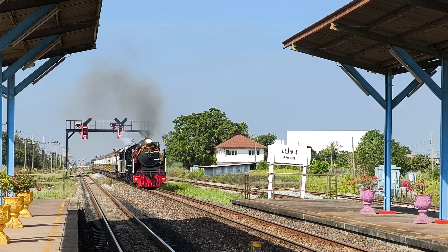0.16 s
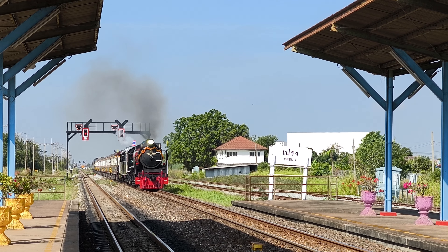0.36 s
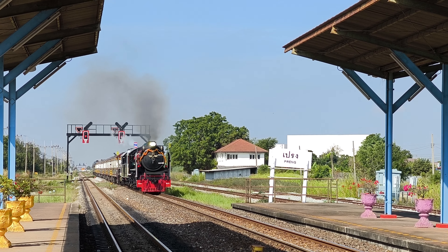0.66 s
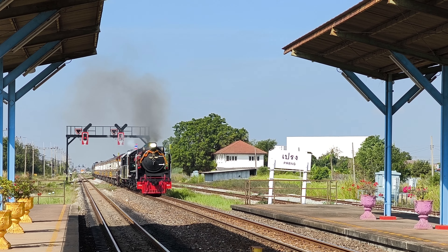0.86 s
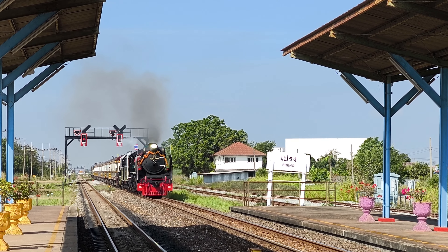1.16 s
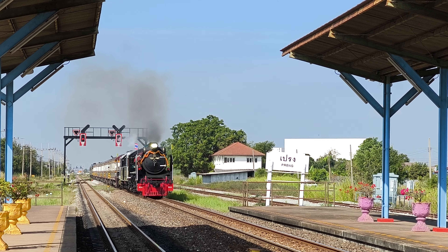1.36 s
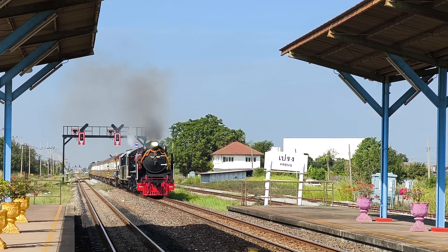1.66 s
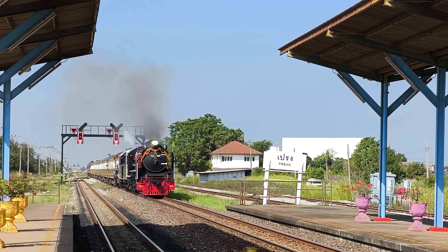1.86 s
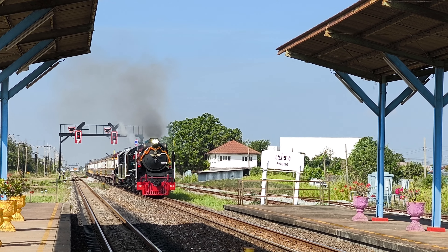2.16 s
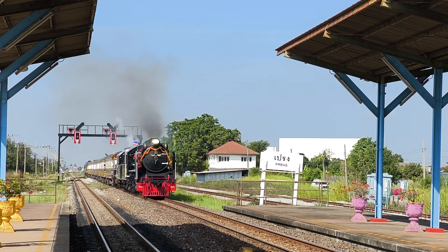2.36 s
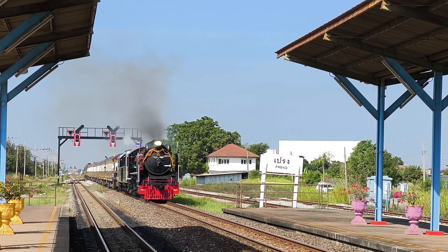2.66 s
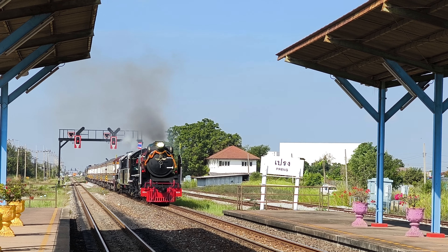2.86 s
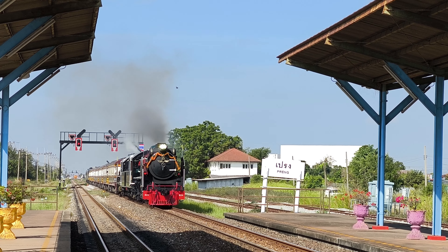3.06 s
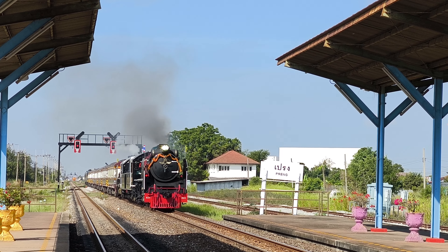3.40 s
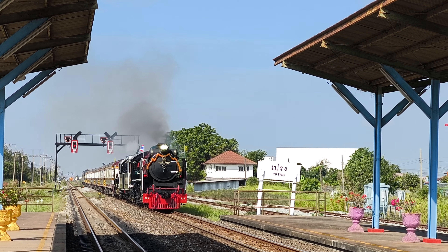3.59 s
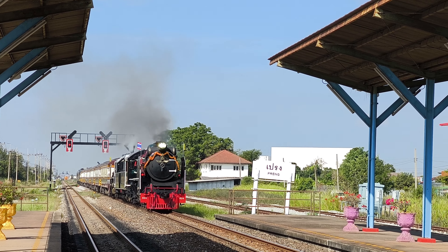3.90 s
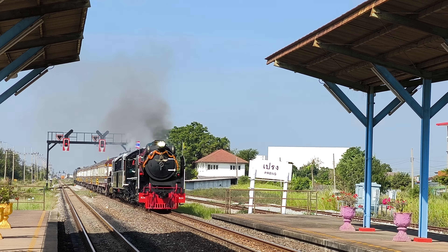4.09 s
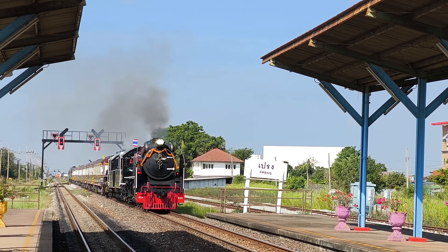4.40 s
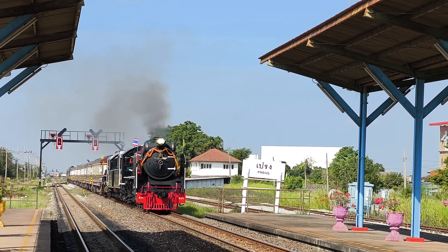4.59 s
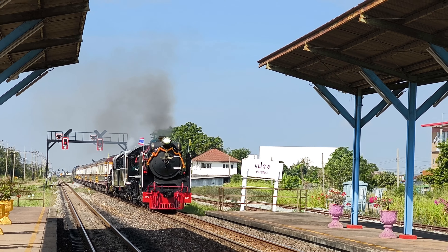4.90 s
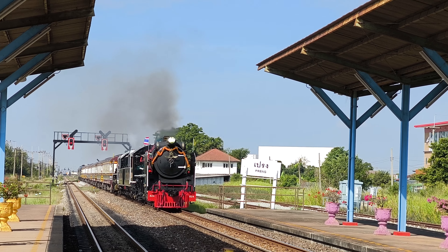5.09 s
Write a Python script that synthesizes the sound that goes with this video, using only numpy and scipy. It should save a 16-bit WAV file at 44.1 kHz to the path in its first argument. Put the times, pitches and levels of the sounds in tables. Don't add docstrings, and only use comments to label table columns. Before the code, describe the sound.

At an open-air station, a steam locomotive's whistle is already sounding: a high, shrill note near 1300 Hz with bright overtones and breathy steam hiss. From about 0.7 to 1.6 seconds it eases, sagging slightly in pitch and becoming thinner, then rises to full strength by 2 seconds and holds, flickering with tiny falters and wet surges. Nearby sheds and walls return blurred, slightly lower echoes. At 4.3 seconds the valve cuts briefly, the note pops back around 4.5, and at 4.8 it droops and shuts off, leaving a fading outdoor tail to about 5.25. Beneath run soft low wheel rumble and broad rolling-train hiss. A very faint far horn sounds around 3.5 seconds. Wind thuds and flaps hard on the stereo microphone until about 2 seconds, mainly on the right, where the whistle ducks during gusts; afterwards only scattered bumps remain.

```python
import sys
import numpy as np
from scipy import signal
from scipy.fft import rfft, irfft, next_fast_len
from scipy.io import wavfile
from scipy.ndimage import uniform_filter1d

SR = 44100
rng = np.random.default_rng(int(sys.argv[2]) if len(sys.argv) > 2 else 0)


def volts(x):
    e = np.asarray(x, float) / 20
    return 10 ** e


def transcribe(signal):
    frames = np.atleast_2d(signal).T
    limited = np.clip(frames, -1, 1)
    pcm = np.round(limited * 32767).astype(np.int16)
    wavfile.write(sys.argv[1], SR, pcm)


N = 231436
LEAD = SR // 2
STEP = 8


def evened(x):
    return x / np.sqrt(np.mean(abs(x) ** 2, -1, keepdims=True) + 1e-20)


def read(points, hz):
    f, value = np.transpose(points)
    return np.interp(np.log(hz + 1), np.log(f + 1), value)


def drift(rate_hz, size, step=1):
    count = next_fast_len(size[-1] // step + 1)
    hz = np.fft.rfftfreq(count, step / SR)
    lowpass = (hz > 0) / (1 + (hz / rate_hz) ** 2)
    spectrum = rfft(rng.standard_normal(size[:-1] + (count,))) * lowpass
    return evened(irfft(spectrum, count)).repeat(step, axis=-1)[..., :size[-1]]


def eddies(rate_hz, size):
    return drift(rate_hz, (3, 2, size), STEP)[..., ::STEP]


def colour(x, db, rad=((0, 0), (1, 0))):
    count = next_fast_len(x.shape[-1] + 4096)
    hz = np.fft.rfftfreq(count, 1 / SR)
    response = volts(read(db, hz)) * np.exp(-1j * read(rad, hz))
    return irfft(rfft(x, count) * response, count)[..., :x.shape[-1]]


def hiss(spectrum, same, patchy_db, size):
    frames = size // 256 + 5
    hz = np.fft.rfftfreq(1024, 1 / SR)
    a, b, c, d, patches = rng.standard_normal((frames, 513, 5)).T
    patches = uniform_filter1d(patches, size=14, axis=0)
    patches = uniform_filter1d(patches, size=10, axis=1)
    same = np.clip(same, 0, 1)
    left = a + 1j * b
    right = same * left + np.sqrt(1 - same ** 2) * (c + 1j * d)
    z = np.array([left, right])
    z *= volts(read(spectrum, hz)[:, None] + patchy_db * patches / patches.std())
    return evened(signal.istft(z, nperseg=1024, noverlap=768)[1][:, :size])


def bells(rows, t):
    return sum(lift_db * np.exp(-(2 * (t - at) / length) ** 2) for at, length, lift_db in rows)


# time_s, pitch_hz, fundamental_db
BLOW = [(-0.4, 1275, -19), (0.0, 1292, -15.5), (0.35, 1275, -13), (0.751, 1228, -13), (1.4, 1214, -19),
        (1.61, 1230, -13.5), (1.67, 1281, -14.5), (1.951, 1308, -9.5), (2.3, 1305, -11), (2.7, 1306, -5),
        (3.15, 1302, -8), (3.349, 1305, -10), (3.552, 1289, -9.5), (3.851, 1308, -11), (4.101, 1298, -16),
        (4.27, 1308, -9.5), (4.6, 1294, -15), (5.25, 1280, -16)]
# start_s, shut_for_s
VALVE_CUTS = [
    (4.3, .19),
    (4.79, 1),
]
# centre_s, length_s, level_db
FADES = [(1.12, .07, -8), (1.44, .09, -8), (1.72, .05, -8), (2.53, .05, -6), (2.78, .06, -5),
         (3.37, .04, -6), (3.5, .05, -6), (3.67, .08, -6), (3.8, .04, -6), (4.03, .04, -6),
         (4.17, .06, -7)]
# centre_s, length_s, level_db
SURGES = [(0.206, 0.18, 3), (1.776, 0.14, 3.5), (2.14, .12, 3.5), (2.473, 0.13, 3), (2.912, 0.16, 2.5),
          (3.263, 0.15, 2), (3.525, 0.17, 3), (3.752, 0.052, -1), (4.077, 0.16, 4), (4.307, 0.076, 4),
          (4.517, 0.072, 7), (4.627, 0.058, 3.5)]


def valve(t):
    close_s, open_s = 0.11, 0.035
    shut_drop_hz, shut_db = 160, -50
    shut = 0
    for start, length in VALVE_CUTS:
        shut = shut + np.interp(t - start, [0, close_s, length, length + open_s], [0, 1, 1, 0])
    s, hz, db = np.transpose(BLOW)
    note_hz = np.interp(t, s, hz) - shut_drop_hz * shut
    fund_db = np.interp(t, s, db) + shut_db * shut ** 2 + bells(FADES, t)
    return note_hz, fund_db, bells(SURGES, t)


# multiple, level_db
OVERTONES = [(2, 0.5), (3, -2), (4, -2), (5, -8.5), (6, -11.5), (7, -16.5), (8, -27.5), (9, -31), (10, -34)]
# frequency_hz, density_db_per_hz
JET = [(900, -9.5), (1800, -2.5), (2300, 0.5), (2900, -3), (3400, 8), (4400, 1), (5700, 4), (7000, -3),
       (8400, 3.5), (9800, -8), (11000, -9), (12400, -13), (14500, -6.5)]
# time_s, phase_rad
ROOF_SWAY = [(0, -1), (.7, -3), (1.3, -0.24), (2.05, -2), (2.35, 1.0), (2.7, 1.82), (3.9, 1.0),
             (4.1, -0.93), (5.25, -0.5)]


def whistle(t, twinkle, unlike, overtone_db, jet_db, swaying):
    full_hz = 1277.7
    note_hz, fund_db, surge_db = valve(t)
    eased_hz = np.maximum(full_hz - note_hz, 0)
    over_db = -23 + surge_db - 0.2 * eased_hz
    steam_db = -38 + surge_db - 0.23 * eased_hz

    source_t = np.arange(-2 * SR, N) / SR
    hz = valve(source_t[::STEP])[0].repeat(STEP)[:len(source_t)]
    wander_hz = 2.287 * drift(12.87, hz.shape, STEP)
    flutter_hz = 4.48 * drift(157, hz.shape, STEP)
    cycles = np.cumsum(hz + wander_hz + flutter_hz) / SR
    turn = np.exp(2j * np.pi * np.interp(t, source_t, cycles))

    jet_level = volts(steam_db + jet_db + 1.92 * drift(25, t.shape, STEP))
    out = jet_level * hiss(JET, same=0.45, patchy_db=3.0, size=len(t))

    heard_s = np.arange(len(t)) / SR - LEAD / SR
    sway = swaying[0] + swaying[1] * np.interp(heard_s, *np.transpose(ROOF_SWAY))
    bright = volts(over_db + overtone_db)
    octave = bright * volts(0.17 * (fund_db - over_db - 11))
    levels = {1: volts(fund_db), 2: octave}
    partial = np.sqrt(2)
    for k, db in [(1, 0.018)] + OVERTONES:
        a, b, c = eddies(2.13 * k ** 1.56, len(t))
        fade = evened(1 + twinkle * k ** 0.5 * (a + 1j * b))
        apart = unlike * min(k / 2, 1) * c[0] + sway[::STEP] * (k == 1)
        fade[1] *= np.exp(-1j * apart)
        fade = fade.repeat(STEP, axis=1)[:, :len(t)]
        partial = partial * turn
        loss_db = 0.03 * max(k - 2, 0) * eased_hz
        out += (fade * (volts(db - loss_db) * levels.get(k, bright) * partial)).real
    return out


# frequency_hz, t60_s
TAIL = [(500, 0.7), (1300, 1.85), (3000, 1.31), (6000, 1.26), (12000, 0.66)]


def tail(x):
    taps = np.zeros((2, 2 * SR))
    at = np.arange(1500, 2 * SR - 40, 40)
    at = at + rng.integers(0, 40, (2, len(at)))
    np.put_along_axis(taps, at, rng.choice([-1., 1.], at.shape), 1)
    hz, t, z = signal.stft(taps, SR, nperseg=256)
    decay = volts(-60 * t / read(TAIL, hz)[:, None])
    ring = signal.istft(z * decay, SR, nperseg=256)[1]
    return signal.fftconvolve(x, ring / np.linalg.norm(ring[0]), axes=1)[:, :x.shape[1]]


# time_s, level_db
WALLS = [(.4, -1), (.7, -6), (1.75, -11), (1.95, -4), (2.6, -7), (3.3, -16), (4.7, -15), (4.9, -6),
         (5.15, -17)]


def train():
    t = np.arange(-LEAD, N) / SR
    straight = whistle(t, twinkle=0.18, unlike=0.89, overtone_db=1.5, jet_db=13., swaying=(0, 1))
    shed_sample = np.clip((t - 0.07 - 0.004 * t) * SR + LEAD, 0, None).astype(int)
    sheds = straight[::-1, shed_sample]
    emitted = t - 0.15 - 0.032 * t
    echo = whistle(emitted, twinkle=0.25, unlike=1.0, overtone_db=-5.5, jet_db=8.0, swaying=(-1.6, 0.3))
    ring = tail(straight + echo / 4)
    near_db = 4.5 * np.maximum(t - 3.56, 0)
    out = straight + sheds * volts(-15 + near_db)
    out += echo * volts(np.interp(t, *np.transpose(WALLS)))
    out += ring * volts(-10 + near_db)
    return volts(-1.0) * out[:, LEAD:]


# frequency_hz, density_db_per_hz
RUMBLE = [(25, -51), (50, -23), (75, -3.5), (95, 4), (130, -6), (200, -12), (300, -30)]


def wheels():
    return volts(-31) * hiss(RUMBLE, same=0.5, patchy_db=1.5, size=N)


# frequency_hz, density_db_per_hz
YARD = [(40, -30), (90, 1), (200, -1), (400, -7), (550, 8), (950, -2.5), (1800, 2), (3200, 6), (4400, 1.5),
        (7000, -11.5), (8400, -24), (11000, -33), (14500, -31)]
# time_s, level_db
YARD_DB = [(0, -31), (1.5, -32.5), (5.25, -32.5)]


def yard():
    level_db = np.interp(np.arange(N) / SR, *np.transpose(YARD_DB))
    return volts(level_db) * hiss(YARD, same=1.0, patchy_db=3.5, size=N)


# centre_s, length_s, left_peak_db, right_peak_db
GUSTS = [(0.117, 0.17, -28, -19.5), (0.373, 0.15, -32.5, -26), (0.502, 0.094, -24.5, -13.5),
         (0.598, 0.095, -22.5, -19), (0.702, 0.087, -20.5, -11.5), (0.807, 0.1, -24, -23.5),
         (0.888, 0.13, -24, -9.5), (0.994, 0.11, -26, -11), (1.099, 0.13, -21.5, -5), (1.244, .11, -29, -9),
         (1.35, .1, -31, -8), (1.423, 0.086, -25, -15), (1.526, 0.13, -26, -17.5),
         (1.673, 0.13, -19.5, -19), (1.808, 0.12, -29, -7.5), (1.964, 0.084, -38, -15),
         (2.32, 0.31, -32, -26.5), (2.76, 0.16, -45, -41), (3.243, .16, -33, -25), (3.865, 0.14, -45, -28),
         (4.492, 0.21, -29, -29), (4.742, .14, -41, -37), (5.002, 0.16, -24.5, -28), (5.224, .15, -23, -30)]
# left_db, right_db
BREEZE_DB = [-39.5, -36.5]


def gusts():
    clock = np.arange(0, N, STEP) / SR
    level = volts(np.array(BREEZE_DB))[:, None] * np.ones(len(clock))
    for s, length, *peak_db in GUSTS:
        bell = np.exp(-(2 * (clock - s) / length) ** 2)
        level = level + volts(np.array(peak_db))[:, None] * bell
    return 20 * np.log10(level).repeat(STEP, axis=1)[:, :N]


# frequency_hz, density_db_per_hz
GUST = [(25, -39), (45, -39), (65, -14), (90, 0.5), (150, 0.5), (220, -1.5), (320, -6.5), (500, -15.5),
        (800, -42), (1500, -79)]
# start_s, length_s, depth_db
LULLS = [
    (0.653, 0.044, 6),
    (1.013, 0.043, 4),
    (1.097, 0.063, 24),
    (1.38, 0.048, 10),
    (1.872, 0.056, 7),
]
# time_s, peak_db, pitch_hz, left_minus_right_db
THUMPS = [(0.014, -13.5, 179, -13), (0.336, -25, 172, 2), (0.551, 2, 207, -8.5), (0.617, -8, 145, -3),
          (0.804, -2, 174, -11), (0.885, -4, 194, -6.5), (0.937, -5, 188.8, -11), (1.075, -1, 170, -11.5),
          (1.188, -8, 398, -9), (1.191, -7, 115, -12.5), (1.26, -4, 131.6, -5), (1.322, -21, 162, -15.5),
          (1.416, -10, 231, -3), (1.49, -13, 130, -5.0), (1.565, -10, 134, -7), (1.965, -1.5, 191, -17.5),
          (2.681, -13, 191, -7.5), (2.752, -41, 158, 11), (3.417, -12.5, 125.2, -11), (3.864, -16, 170, -2),
          (4.299, -38, 99.1, 13), (4.634, -12.5, 146, -5), (5.003, -17.5, 113, -3)]


def wind():
    clock = np.arange(N) / SR
    level_db = gusts()
    for start, length, depth_db in LULLS:
        calm = np.interp(clock - start, [0, 0.004, length, length + 0.0083], [0, 1, 1, 0])
        level_db[1] -= depth_db * calm
    lumps_db = 4.98 * drift(35.5, (2, N), STEP)
    low = colour(rng.standard_normal((2, N)) * volts(lumps_db), GUST)
    high_gust = [(f * 2.16, db) for f, db in GUST]
    high = colour(rng.standard_normal((2, N)) * volts(2.13 * lumps_db), high_gust)
    out = volts(level_db + 1.0) * evened(evened(low) + volts(-12.5) * evened(high))

    t = np.arange(-0.012, 0.02, 1 / SR)
    late = t - 0.003
    for s, db, hz, pan_db in THUMPS:
        turn = rng.random()
        push = np.exp(-(t * hz / 0.63) ** 2) * np.cos(2 * np.pi * (hz * t + turn))
        snap = 0.31 * np.exp(-(late * hz / 0.13) ** 2) * np.cos(2 * np.pi * 1.8 * hz * late)
        port = int(pan_db < 0)
        part = out[port, max(round(s * SR) - 150, 0):][:len(t)]
        part += 2 * volts(db - 5) * (push + snap)[:len(part)]
    return out


# time_s, pitch_hz, level_db
HOOT = [
    (3.42, 664, -35),
    (3.5, 665, -42),
    (3.6, 667, -32.5),
    (3.66, 671, -51),
]


def horn():
    s, hz, db = np.transpose(HOOT)
    t = np.arange(N) / SR
    cycles = np.cumsum(np.interp(t, s, hz)) / SR
    return volts(np.interp(t, s, db, -120, -120)) * np.sin(2 * np.pi * cycles)


def air(x, t):
    top = colour(x, [(7500, -38), (9500, -6), (11500, 0)])
    return x + top * (volts(-1.5 * (4.0 - t)) - 1)


# frequency_hz, level_db
PORT_DB = [(700, -0.5), (1800, -1), (2200, -6), (3000, -9), (3500, -13.5), (4400, -1), (5700, -6.5),
           (7000, 2), (8400, -24.5), (9800, -6), (11000, -6), (14000, -11)]
# frequency_hz, phase_rad
PORT_RAD = [(0, -3), (690, -0.5), (1290, 3.0), (1890, 0.54), (3700, 5.0), (5250, 3), (6290, 5),
            (11500, -1.6), (14000, -2), (14400, -1)]


def right_port(x):
    calm_gain_db, duck_from_db, duck_share = 2.5, -20.5, 1.02
    gain_db = calm_gain_db - duck_share * np.maximum(gusts()[1] - duck_from_db, 0)
    return colour(x, PORT_DB, PORT_RAD) * volts(gain_db)


def scene():
    far = train() + wheels() + yard() + horn()
    far = air(far, np.arange(N) / SR)
    far[1] = right_port(far[1])
    return far + wind()


def roll_off(x):
    return signal.sosfilt(signal.butter(12, 14780, fs=SR, output="sos"), x)


def record(dry):
    power_db = 10 * np.log10(abs(uniform_filter1d(dry ** 2, size=300)) + 1e-12)
    fall_db = np.arange(N) * 27.4 / SR
    held_db = np.maximum.accumulate(power_db + fall_db, axis=1) - fall_db
    over_db = np.maximum(held_db + 7.5, 0)
    ducked = dry / volts(0.57 * uniform_filter1d(over_db, size=200))
    rounded = 0.86 * np.tanh(ducked / 0.86)
    mix = colour(rounded, [(8, -35), (25, -11), (50, -9), (80, 0), (14250, 0), (14400, -40)])
    return roll_off(mix)


dry = scene()
out = record(dry)
transcribe(out)
```